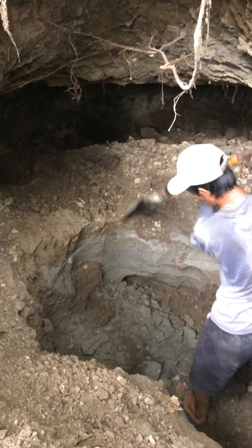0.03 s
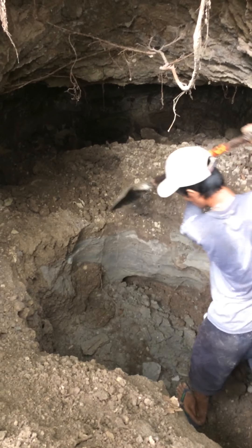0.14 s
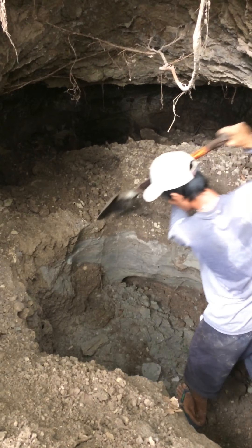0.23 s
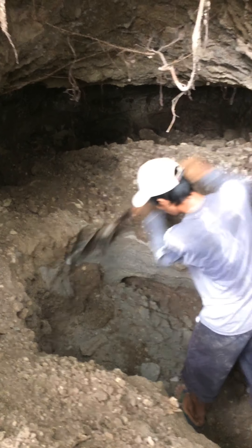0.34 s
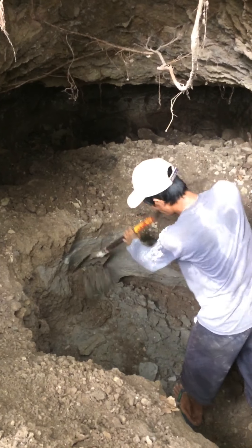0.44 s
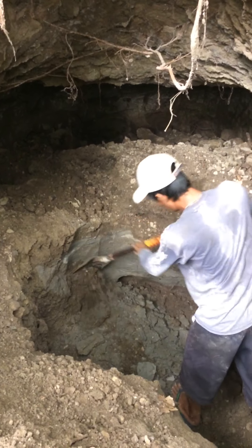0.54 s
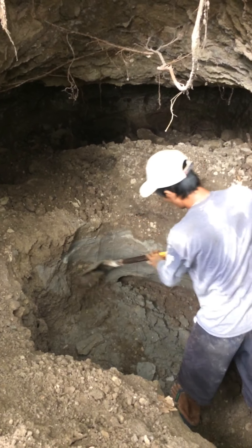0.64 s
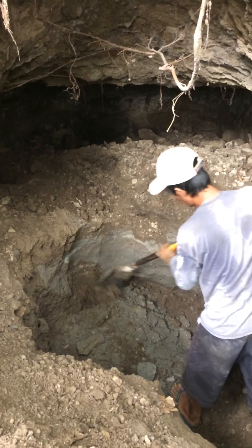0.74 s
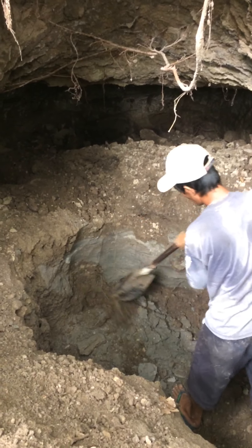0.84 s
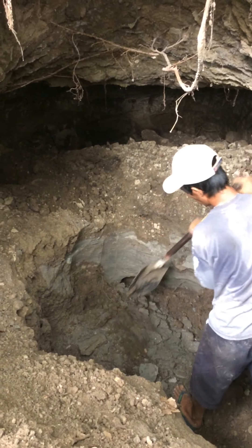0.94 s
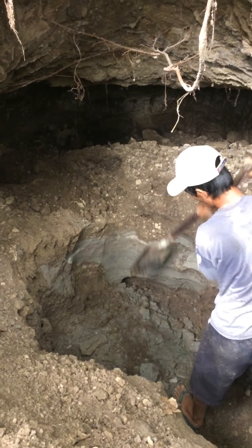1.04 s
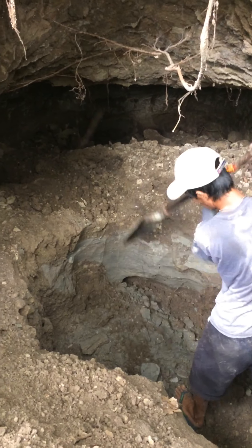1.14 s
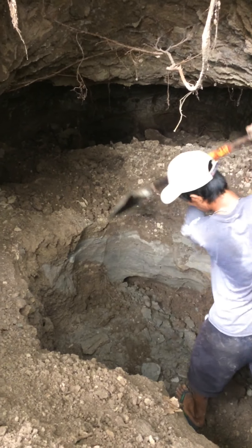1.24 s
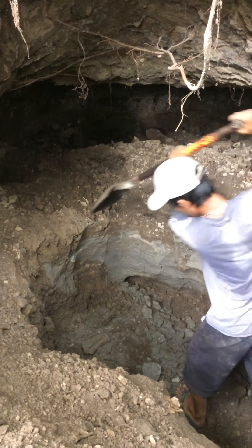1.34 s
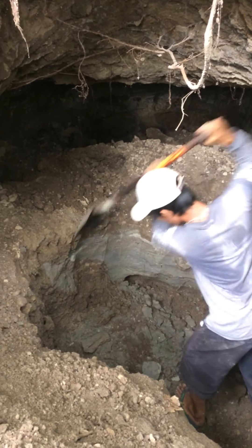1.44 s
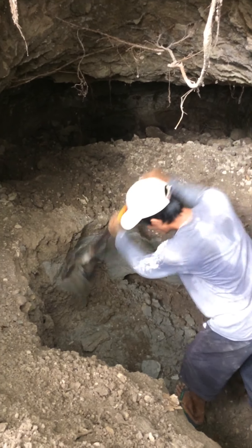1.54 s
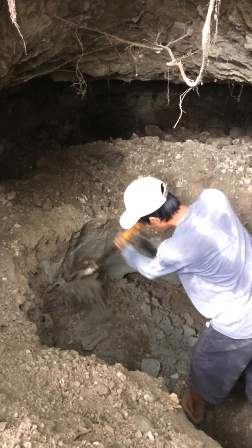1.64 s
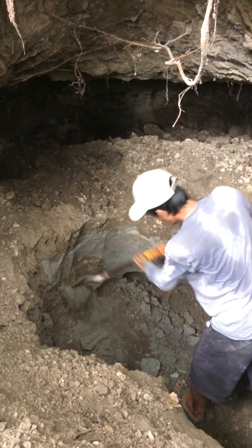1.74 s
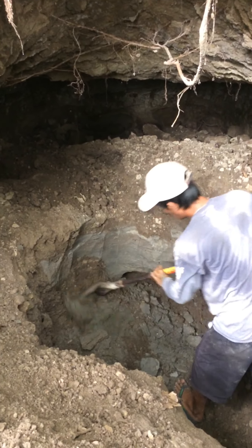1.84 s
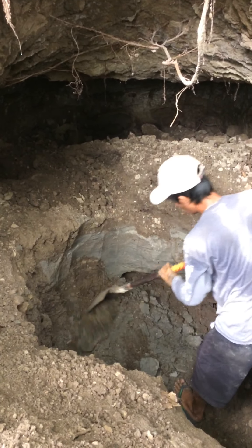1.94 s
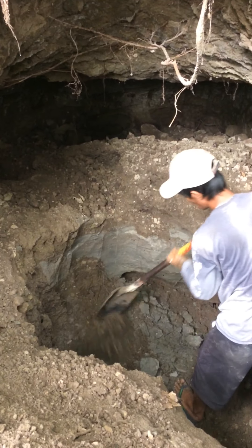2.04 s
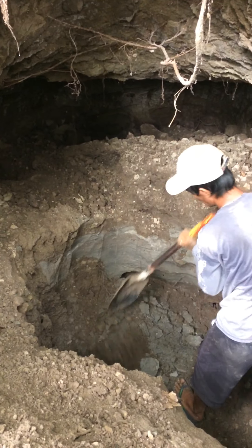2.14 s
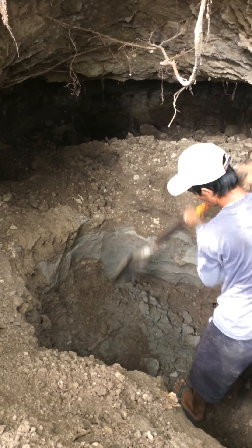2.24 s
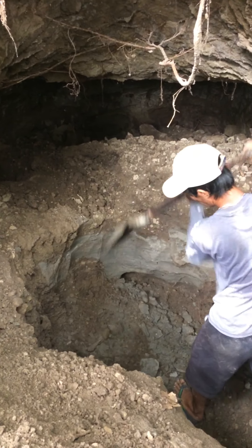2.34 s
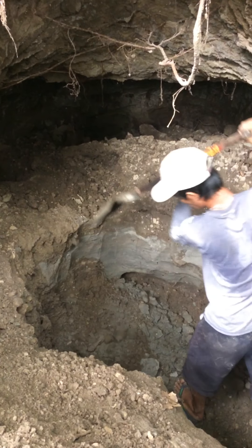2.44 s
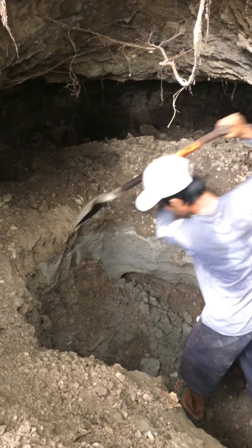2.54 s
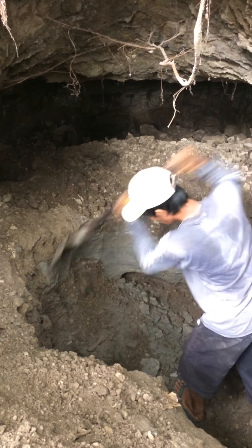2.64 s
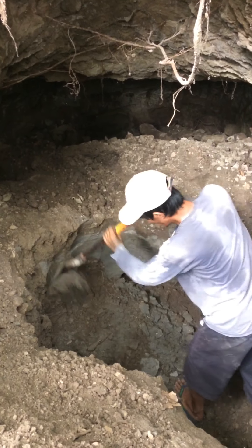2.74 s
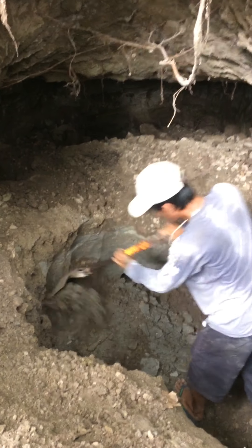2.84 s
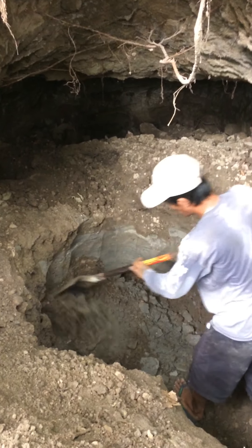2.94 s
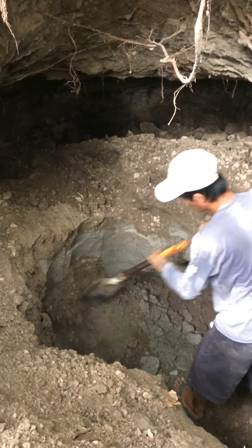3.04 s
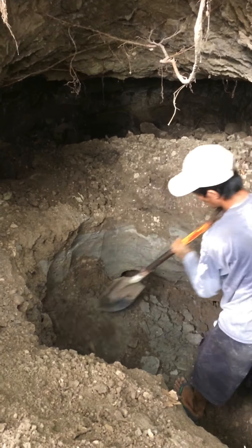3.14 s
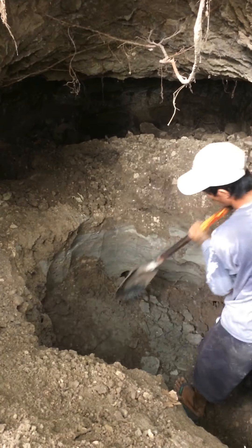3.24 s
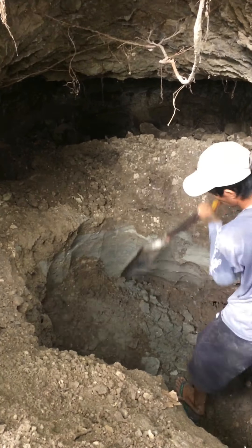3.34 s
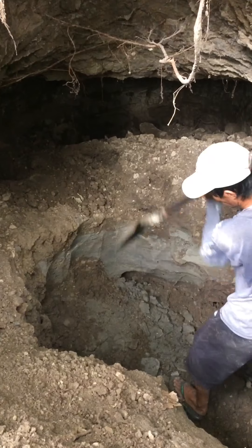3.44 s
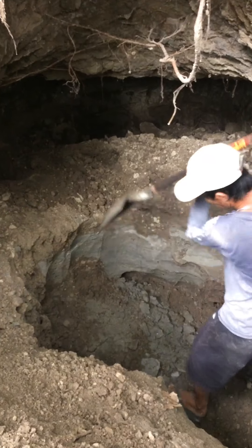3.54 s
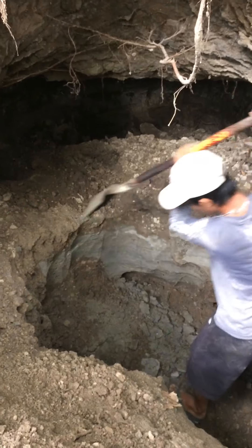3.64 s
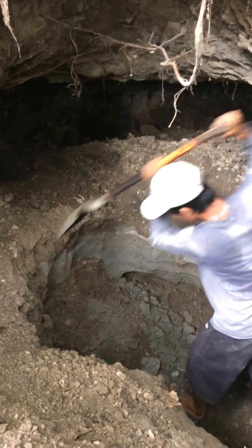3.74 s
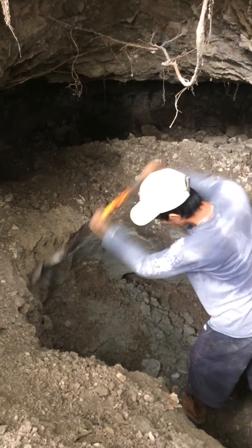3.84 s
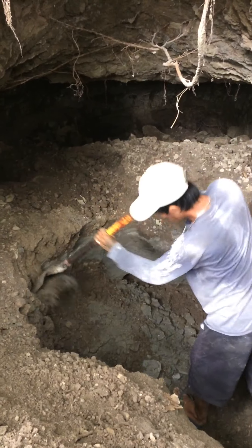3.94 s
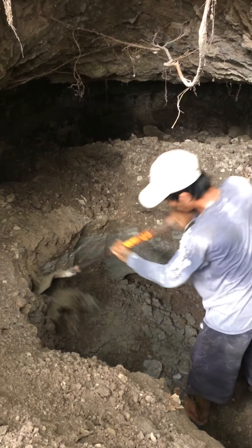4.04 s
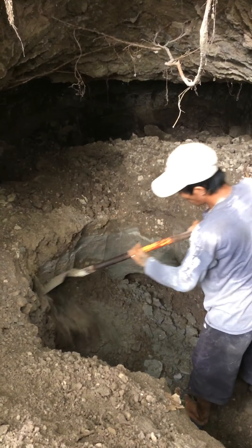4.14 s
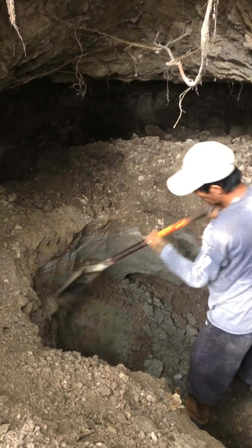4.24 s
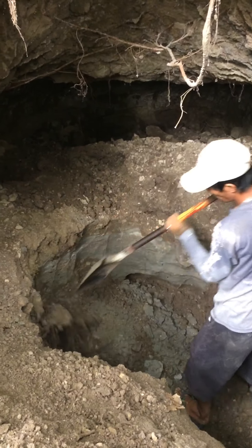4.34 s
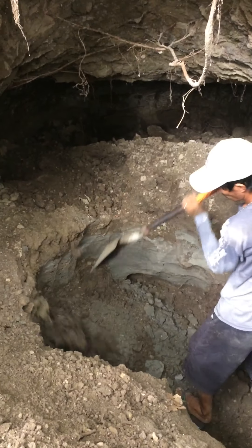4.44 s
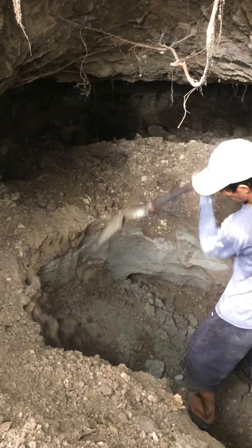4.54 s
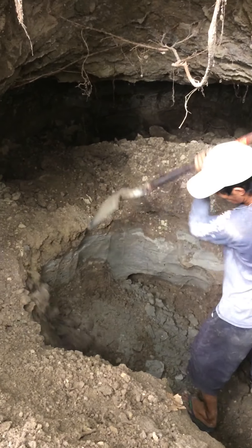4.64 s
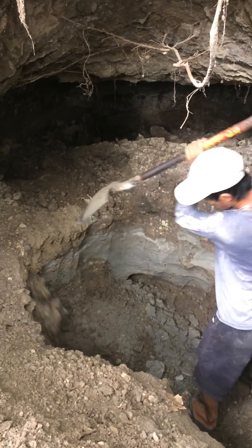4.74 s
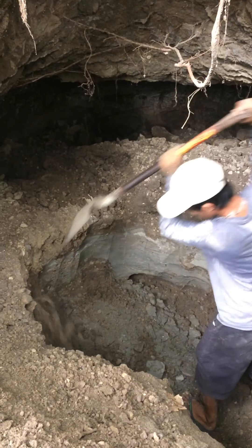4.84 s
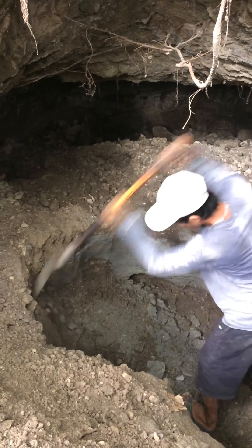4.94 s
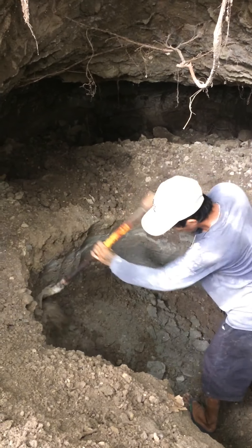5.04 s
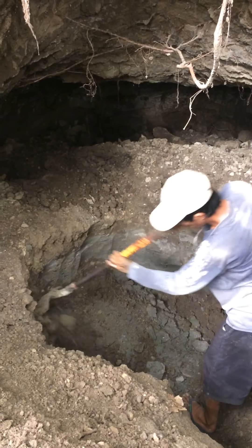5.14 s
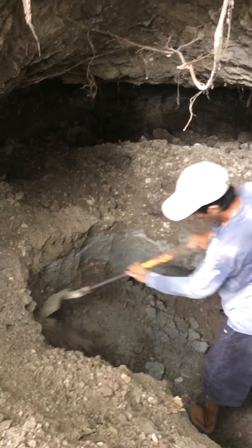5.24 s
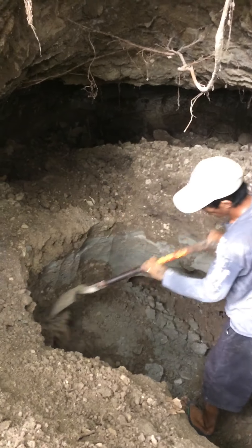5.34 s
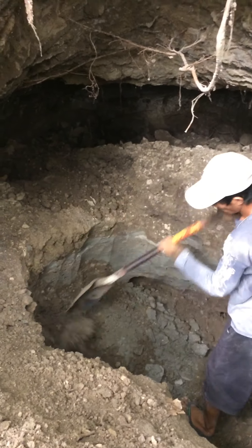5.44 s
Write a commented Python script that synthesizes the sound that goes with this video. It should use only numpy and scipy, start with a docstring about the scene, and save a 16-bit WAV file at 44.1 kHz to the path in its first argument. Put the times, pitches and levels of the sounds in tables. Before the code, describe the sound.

Five steady, crunching shovel strikes into packed, rocky earth outdoors, with loose soil and small stones pattering between the blows.

```python
"""A steel digging blade is driven five times into stony soil in a pit, a few metres away.
A brief gritty hiss swells just before each hit; then stone cracks, clods rattle, the ground thuds.
Between strokes loose soil trickles, small stones tumble and pebbles ring the lifted blade.
The earth walls add short reflections; behind lie soft outdoor rumble and a thin band of insects."""
import sys
import numpy as np
from scipy import signal
from scipy.fft import rfft, irfft, next_fast_len
from scipy.io import wavfile

SR = 44100
rng = np.random.default_rng(int(sys.argv[2]) if len(sys.argv) > 2 else 0)


def materialize(psi):
    """Save the field psi as 16-bit PCM at rate SR to the path in sys.argv[1].

    A 1-D psi becomes a single channel; in a 2-D psi each row is a channel.
    """
    bounded = np.clip(np.atleast_2d(psi).T, -1, 1)
    quanta = np.round(bounded * 32767).astype(np.int16)
    wavfile.write(sys.argv[1], SR, quanta)


N = 242550


def undb(db):
    return 10 ** (np.asarray(db) / 20)


def level(x, db):
    return x * undb(db) / np.sqrt(np.mean(x ** 2))


def colour(x, spectrum):
    """Filter by a curve of (Hz, dB) points."""
    hz, db = np.transpose(spectrum)
    size = next_fast_len(len(x))
    log_hz = np.log(np.arange(size // 2 + 1) * SR / size + 1)
    gain = undb(np.interp(log_hz, np.log(hz), db))
    return irfft(rfft(x, size) * gain, size)[:len(x)]


def ring(x, hz, t60_s):
    """One damped mode, unit swing for a unit blow."""
    r, w = np.exp(-np.log(1000) / (t60_s * SR)), 2 * np.pi * hz / SR
    return signal.lfilter([0, r * np.sin(w)], [1, -2 * r * np.cos(w), r * r], x + 1e-18)


def grains(per_s, spread_db):
    """Dense random clicks with long-tailed sizes, rms 1."""
    count = min(int(per_s * N / SR), N // 16)
    where, tail, swing = rng.random((N // 16, 3))[:count].T
    out = np.zeros(N)
    out[(where * N).astype(int)] = (2 * swing - 1) * (1 - tail) ** (-spread_db * np.log(10) / 20)
    return level(out, 0)


def wander(per_s):
    """Random values joined by straight lines, spread near 1."""
    knots = rng.standard_normal(N // 100)
    return np.interp(np.arange(N) * per_s / SR, np.arange(len(knots)), knots) / np.sqrt(2 / 3)


def fragments(spectrum, per_s, spread_db, cycles, patchy_db, patch_per_s):
    """Pieces of every size knock; each size rings a few cycles at its own pitch."""
    out = 0
    for hz in 300 * 2 ** np.arange(0, 5.7, .4):
        knocks = grains(per_s * np.sqrt(hz / 2000), spread_db) * undb(patchy_db * wander(patch_per_s))
        out += np.sqrt(hz) * level(ring(knocks, hz, cycles / hz), 0)  # wider bands carry more power
    return level(colour(out, spectrum), 0)


# Outdoor air spectrum. Each row: frequency in Hz, gain in dB.
AIR_SPECTRUM = [(15, -32.5), (25, -8.5), (59, 4.5), (141, 2), (796, -17), (4870, -32), (7110, -29.5),
                (8140, -22), (9320, -37.5), (12500, -32.5), (16000, -45)]


def air():
    """Smooth distant hiss over a rumble that swells and sinks."""
    noise = level(colour(rng.standard_normal(N), AIR_SPECTRUM), db=-62.5)
    rumble = signal.sosfilt(signal.butter(2, 250, fs=SR, output="sos"), noise)
    return noise + (undb(1.3 * wander(per_s=6.1)) - 1) * rumble


def insects():
    """A steady, narrow band of high hiss."""
    band = signal.butter(2, [7400, 8400], "band", fs=SR, output="sos")
    return level(signal.sosfilt(band, rng.standard_normal(N)), db=-86)


# Soil slides. Each row: start in seconds, level in dB, fade in dB per second.
SLIDES = [(0, -71.5, 24), (0.499, -64.5, 13), (1.68, -63, 13.5), (2.9, -63.5, 15.5), (3.98, -66, 5),
          (5.1, -66, 28.5)]
# Crumb spectrum. Each row: frequency in Hz, gain in dB.
CRUMB_SPECTRUM = [(200, -18), (600, -5), (2000, -5), (7000, -9.5), (15000, -14)]


def trickle():
    """Soil crumbs roll down in a fine, patchy patter."""
    crumbs = fragments(CRUMB_SPECTRUM, 1800, spread_db=1.3, cycles=4.2, patchy_db=.71, patch_per_s=15)
    return crumbs * undb(slide_db(np.arange(N) / SR))


def slide_db(t):
    """Level of the sliding soil: restarts after each stroke, then fades."""
    start_s, db, fade_db_per_s = np.transpose(SLIDES)
    latest = np.clip(np.searchsorted(start_s, t, "right") - 1, 0, None)
    return db[latest] - fade_db_per_s[latest] * (t - start_s[latest])


# Tumbling stones. Each row: start in seconds, level in dB, pitch in Hz, length in seconds.
TUMBLES = [(.683, -61.5, 1750, 0.019), (.713, -63, 1790, 0.027), (.742, -58.5, 1850, 0.014),
           (2.07, -69, 1610, 0.023), (2.132, -70, 5400, 0.031), (2.89, -47, 3100, 0.011),
           (3.623, -65.5, 977, .008), (4.063, -68.5, 1670, .05), (4.18, -65.5, 1160, 0.028),
           (4.238, -72, 2320, 0.052), (4.738, -69.5, 1180, 0.024), (4.927, -69, 2190, .035),
           (5.238, -70, 7070, 0.019), (5.28, -68.5, 2860, 0.039), (5.327, -69, 2520, 0.051),
           (5.439, -67.5, 1836, .059)]


def tumbles(stray_count=14, stray_s=.014):
    """Short patters of knocks ring small stones; faint strays fall at random times."""
    out, knocks = np.zeros(N), grains(per_s=1200, spread_db=.45)
    strays = []
    for when, pitch in rng.random((stray_count, 2)):
        start_s = when * (N / SR - 2 * stray_s)
        hz = 2600 * 2 ** (.4 * (2 * pitch - 1))
        strays.append((start_s, slide_db(start_s) - 5, hz, stray_s))
    for start_s, db, hz, length_s in list(TUMBLES) + strays:
        at, size = int(start_s * SR), int(length_s * SR)
        patter = np.zeros(min(size + SR // 20, N - at))
        patter[:size] = (knocks[at:at + size] + .3) * np.hanning(size) ** .5
        stone = sum(ring(patter, hz * ratio, t60_s=26 / hz) for ratio in (.8, 1, 1.12, 1.6))
        out[at:at + len(stone)] += stone * undb(db) * np.sqrt(size / np.sum(stone ** 2))
    return out


# Free blade modes. Each row: frequency in Hz, gain in dB, t60 in seconds.
BLADE_MODES = [(2050, -8, .05), (2270, -7, .05), (2562, -5, .1), (2850, -7, .04), (3150, -7, .035),
               (3550, -6, .035), (4075, -3, .04), (4270, -5, .03), (4830, -10, .03), (5300, -15, .025),
               (5790, -14, .025), (6110, -8, .03), (6325, -7, .16), (6630, -4, .045), (6920, -2, .045),
               (7300, -4, .04), (7730, -6, .06), (8800, -12, .03), (10620, -16, .03)]
# Pebble hits. Each row: start in seconds, peak in dB, skitter length in seconds,
# gain of the modes below 5 kHz in dB, t60 factor.
CLINKS = [(0.808, -52, .012, -16, 0.54), (0.896, -56, 0.0086, 1, .6), (.964, -57, 0.012, -9, 0.79),
          (2.338, -57, .025, 8, 1.5), (2.3967, -45.5, 0.01, -0.5, 0.79), (3.112, -49.5, 0.0047, 6, 0.53),
          (3.1972, -34.5, 0.019, -5, 1.1), (3.274, -53.5, 0.026, 5.5, 1.04), (3.299, -54, 0.054, -8, .4),
          (3.477, -54, .008, 2.5, .52), (4.047, -58, 0.014, -2, 0.45), (4.356, -40, 0.015, 1, 0.9),
          (4.445, -48.5, 0.012, 2.5, 0.33), (4.487, -54, 0.011, -10, .6), (4.626, -47.5, 0.0064, 2, 0.49),
          (4.675, -54.5, 0.007, 3.5, .45), (5.461, -48.5, 0.013, 1, 0.51)]


def clinks(scatter_db=1.5, tick_db=-19):
    """A pebble hits the lifted blade and skitters, ringing each steel mode by its own amount."""
    out = np.zeros(N)
    offsets_db = scatter_db * rng.standard_normal((len(CLINKS), len(BLADE_MODES)))
    skitter = .14 * grains(per_s=2500, spread_db=.71)
    for (start_s, db, length_s, low_db, t60_factor), mode_offsets_db in zip(CLINKS, offsets_db):
        at = int(start_s * SR)
        t = np.arange(min(SR // 5, N - at)) / SR
        taps = skitter[at:at + len(t)] * np.sqrt(np.clip(1 - t / length_s, 0, 1))
        taps[0] = .18  # first impact
        steel = sum(undb(mode_db + low_db * (hz < 5000) + offset_db) * ring(taps, hz, t60_s * t60_factor)
                    for (hz, mode_db, t60_s), offset_db in zip(BLADE_MODES, mode_offsets_db))
        tick = ring(taps, hz=8700, t60_s=.0015)
        clink = steel / np.abs(steel).max() + undb(tick_db) * tick / np.abs(tick).max()
        out[at:at + len(t)] += undb(db) * clink
    return out


# Ground thuds under a blow or falling clod. Each row: start in seconds, level in dB, pitch in Hz.
THUDS = [(.47, -34, 119), (0.487, -33.5, 84), (1.61, -32, 99), (1.698, -48, 46.7), (2.768, -17.5, 90.4),
         (2.8, -41, 49.5), (3.907, -32, 70.3), (3.961, -44, 46.9), (4.76, -42.5, 84.6), (5.046, -31, 85),
         (5.099, -44, 58)]


def thuds():
    """A soft half-cycle push sets the ground swinging; deeper thuds last longer."""
    out = np.zeros(N)
    for start_s, db, hz in THUDS:
        at = int(start_s * SR)
        push = np.hanning(int(SR / hz / 2))
        blow = np.zeros(min(SR, N - at))
        blow[:len(push)] = push / push.sum()
        out[at:at + len(blow)] += undb(db) * ring(blow, hz, t60_s=.13 * (85 / hz) ** 2.9)
    return out


# Soil-damped modes of blade and stone. Each row: frequency in Hz, gain in dB, t60 in seconds.
BURIED_MODES = [(707.3, -3, 0.037), (930, -11, 0.0064), (1323, -7, 0.045), (1498, -2.5, .04),
                (1865, -3, 0.047), (1986, -9.5, 0.033), (2860, -5, 0.014), (3170, -4.5, .03),
                (3580, -6.5, 0.025), (5840, -9.5, 0.036)]
# Stone strikes. Each row: start in seconds, snap peak in dB, brightness in dB, relative ring in dB.
CRACKS = [(.454, -7, 0, -14), (1.6038, -12.5, -4, -6), (1.634, -22, -12, -6), (2.7647, -12, -2, -16),
          (2.7709, -12, -14, -12), (3.9065, -19, 0, -18), (5.0591, -11, -6, -16)]


def cracks(scatter_db=2):
    """The edge meets a stone: a sharp snap, then a short ring of blade and stone."""
    out, blow = np.zeros(N), signal.unit_impulse(SR // 5)
    flick = blow - np.roll(blow, 5)  # push and rebound
    offsets_db = scatter_db * rng.standard_normal((len(CRACKS), len(BURIED_MODES)))
    for (start_s, db, bright_db, ring_db), mode_offsets_db in zip(CRACKS, offsets_db):
        snap = ring(flick, hz=3200, t60_s=.0018) + undb(bright_db) * ring(blow, hz=5800, t60_s=.002)
        body = sum(undb(mode_db + offset_db) * ring(blow, hz, t60_s)
                   for (hz, mode_db, t60_s), offset_db in zip(BURIED_MODES, mode_offsets_db))
        at = int(start_s * SR)
        out[at:at + len(blow)] += undb(db) * (snap / np.abs(snap).max() + undb(ring_db) * body)
    return out


# Clod spectrum. Each row: frequency in Hz, gain in dB.
CLOD_SPECTRUM = [(90, -40), (200, -19.5), (480, -14.5), (700, -3), (1460, -5), (2800, -10), (4500, -20),
                 (8000, -24.5), (12000, -45.5)]


def clods():
    """Coarse fragments knock together and rattle the buried blade."""
    rattle = sum(undb(db) * level(ring(grains(per_s=500, spread_db=1.5), hz, t60_s), 0)
                 for hz, db, t60_s in BURIED_MODES)
    knocks = fragments(CLOD_SPECTRUM, 1200, spread_db=1.8, cycles=6.4, patchy_db=3.2, patch_per_s=120)
    return level(knocks + level(rattle, db=-3.5), 0)


# Spectra of packed earth and fine grit. Each row: frequency in Hz, gain in dB.
EARTH_SPECTRUM = [(60, -25), (120, -0.5), (200, -1), (280, -11.5), (450, -2), (700, -19.5), (1500, -44.5)]
GRIT_SPECTRUM = [(470, -37), (800, -9), (1810, 1.5), (2470, -5), (3260, -0.5), (4630, -1.5), (8550, -1),
                 (14700, -12), (16000, -14)]
# Gritty hiss swelling just before the hit. Each row: start, rise and length in seconds, clod and grit levels in
# dB.
LEAD_INS = [(0.392, 0.018, .034, -66, -55), (0.424, 0.0058, 0.046, -63, -31.5),
            (1.565, 0.0052, 0.017, -44, -44.5), (1.576, .009, 0.025, -36.5, -31.5),
            (2.711, 0.0095, 0.058, -40.5, -30.5), (3.886, 0.018, .014, -59, -39),
            (5.008, .024, .03, -67, -44.5)]
# Blade jolting to a halt. Each row: start and clod t60 in seconds, clod, grit and earth levels in dB.
JOLTS = [(0.4543, 0.043, -22, -20.5, -44), (.464, .09, -31.5, -31, -36.5), (1.603, 0.087, -17.5, -20, -33),
         (1.632, 0.07, -29, -34.5, -33), (2.762, 0.081, -21, -32, -39), (2.777, 0.076, -34.5, -45, -33),
         (3.904, 0.15, -36.5, -27, -34), (5.037, 0.067, -30, -32.5, -36), (5.052, 0.098, -27, -26, -48),
         (5.073, 0.11, -42, -43.5, -43.5)]
# Blade dragging in loose soil. Each row: start and length in seconds, clod and grit levels in dB.
DRAGS = [(0.657, .09, -70, -65.5), (1.641, 0.046, -39.5, -43.5), (1.905, 0.02, -72, -62.5),
         (2.78, 0.067, -41.5, -44), (2.848, 0.053, -50.5, -49.5), (2.988, 0.038, -67.5, -63.5),
         (3.918, 0.035, -39, -38.5), (4.208, 0.064, -76.5, -62.5), (5.236, .26, -79.5, -67.5)]


def crunch():
    """A gritty hiss swells, then the blade jolts and drags in earth, clods and grit."""
    power = np.zeros((3, N))
    for start_s, rise_s, length_s, clod_db, grit_db in LEAD_INS:
        power += burst_power(start_s, [grit_db - 16.5, clod_db, grit_db], length_s, rise_s, t60_s=.04)
    for start_s, t60_s, clod_db, grit_db, earth_db in JOLTS:
        power += burst_power(start_s, [earth_db, clod_db, grit_db],
                             length_s=.01, rise_s=.00056, t60_s=t60_s)
    for start_s, length_s, clod_db, grit_db in DRAGS:
        power += burst_power(start_s, [grit_db - 7, clod_db, grit_db], length_s, rise_s=.006, t60_s=.1)
    earth = level(colour(rng.standard_normal(N), EARTH_SPECTRUM), 0)
    grit = fragments(GRIT_SPECTRUM, 1500, spread_db=.8, cycles=7, patchy_db=2.8, patch_per_s=120)
    return np.sum(np.sqrt(power) * [earth, clods(), grit], axis=0)


def burst_power(start_s, layers_db, length_s, rise_s, t60_s):
    """Earth, clod and grit power envelopes: swell, hold, die away."""
    at = int(start_s * SR)
    t = np.arange(min(SR // 2, N - at)) / SR
    swell = np.clip(t / rise_s, 0, 1) ** 2
    layer_t60_s = t60_s * np.array([[1.3], [1], [.68]])  # earth settles last, grit first
    fall_db = -60 * np.clip(t - length_s, 0, None) / layer_t60_s
    power = np.zeros((3, N))
    power[:, at:at + len(t)] = (swell * undb(np.array(layers_db)[:, None] + fall_db)) ** 2
    return power


def pit(x, t60_s=.024, echo_db=-22.5):
    """Short scattered reflections from the earth walls."""
    t = np.arange(SR // 4) / SR
    tail = rng.standard_normal(len(t)) * undb(-60 * t / t60_s) * (t > .003)
    tail = signal.lfilter([1], [1, -.6], tail)  # earth absorbs treble
    tail *= undb(echo_db) / np.sqrt(np.sum(tail ** 2))
    return x + signal.fftconvolve(x, tail)[:N]


def scene():
    """Digging in the pit over the outdoor background, mono."""
    digging = pit(crunch() + cracks() + clinks() + tumbles()) + thuds()
    return (digging + trickle() + air() + insects())[None]


def record(dry, low_hz=38, top_hz=15900):
    """The phone cuts the lowest bass and the top."""
    bass_cut = signal.sosfilt(signal.butter(4, low_hz, "high", fs=SR, output="sos"), dry)
    return signal.sosfilt(signal.ellip(10, .2, 75, top_hz, fs=SR, output="sos"), bass_cut)


dry = scene()
out = record(dry)
materialize(out)
```